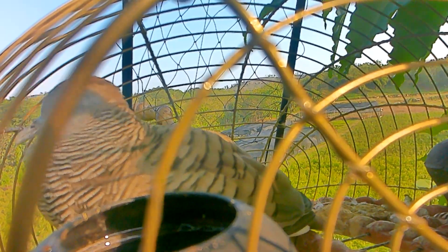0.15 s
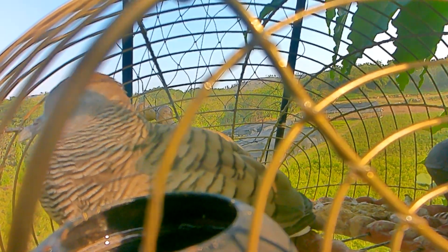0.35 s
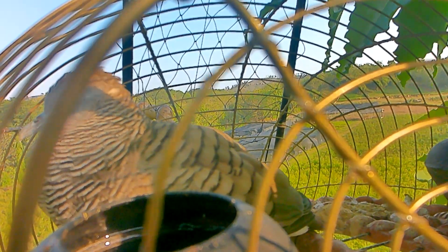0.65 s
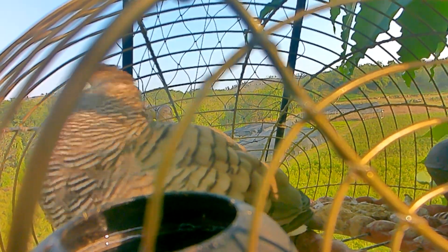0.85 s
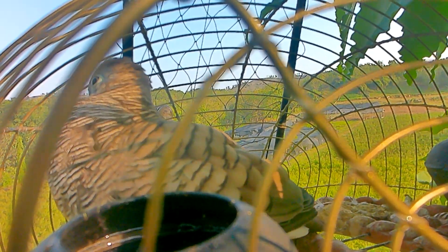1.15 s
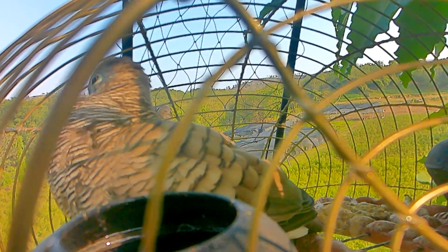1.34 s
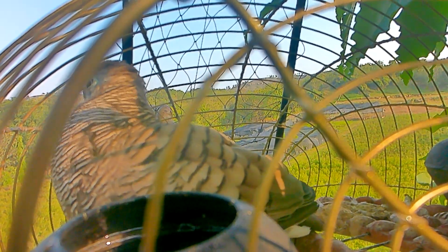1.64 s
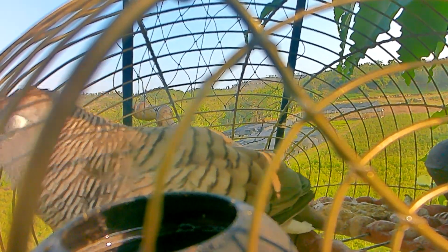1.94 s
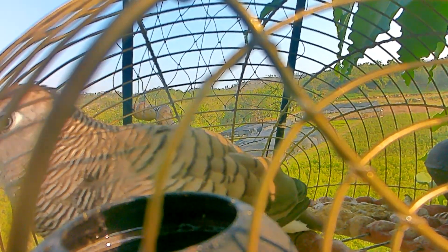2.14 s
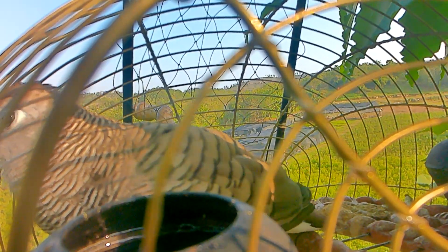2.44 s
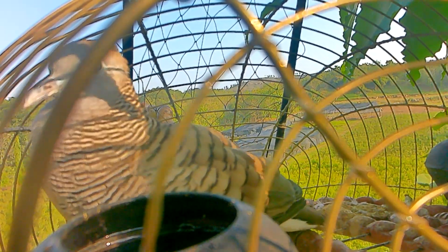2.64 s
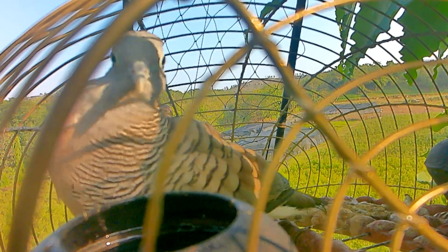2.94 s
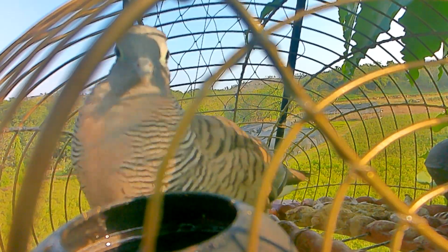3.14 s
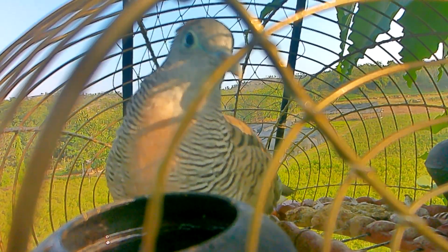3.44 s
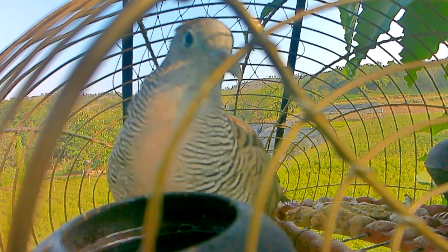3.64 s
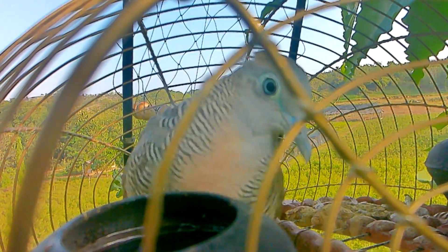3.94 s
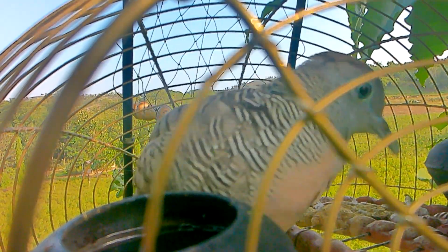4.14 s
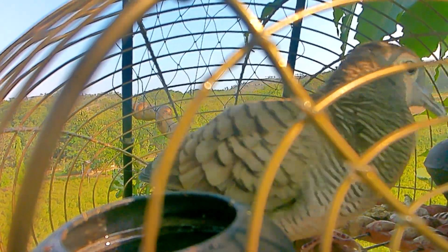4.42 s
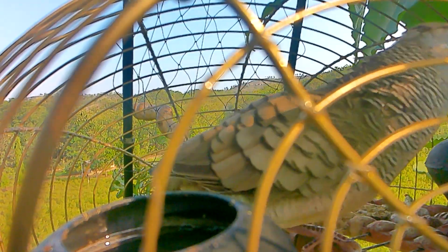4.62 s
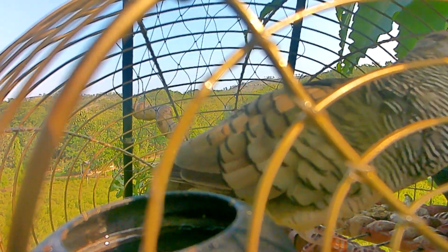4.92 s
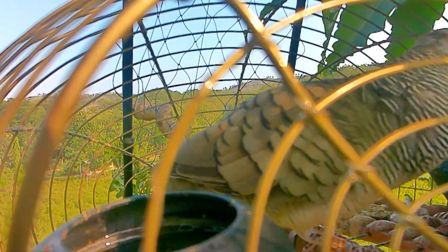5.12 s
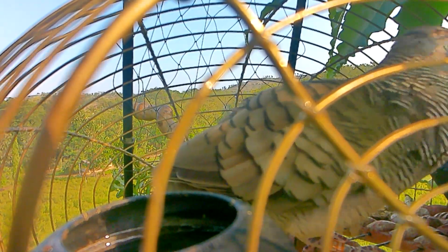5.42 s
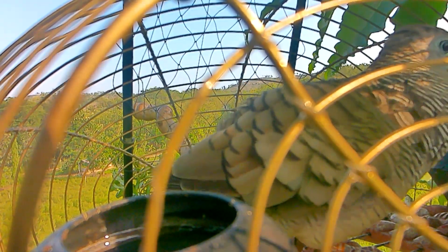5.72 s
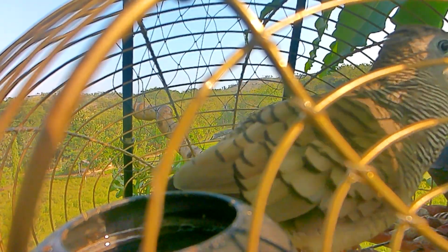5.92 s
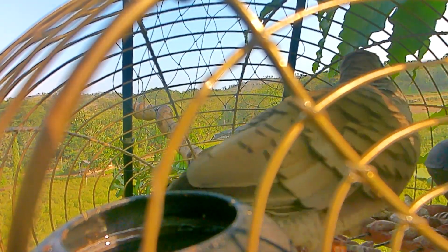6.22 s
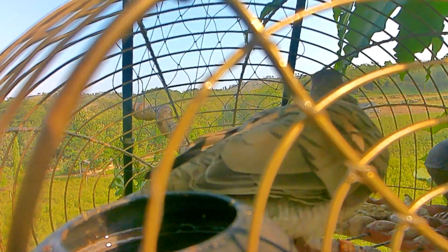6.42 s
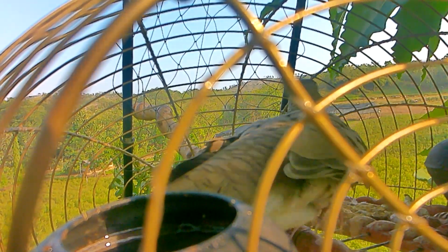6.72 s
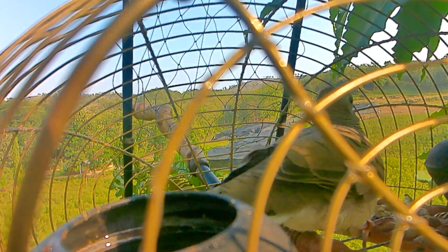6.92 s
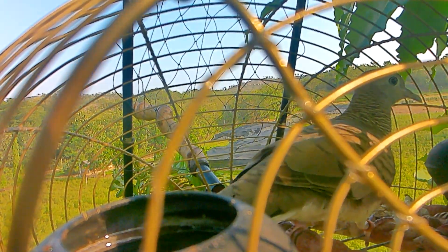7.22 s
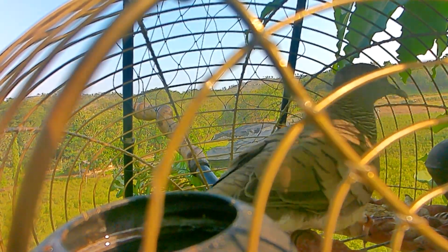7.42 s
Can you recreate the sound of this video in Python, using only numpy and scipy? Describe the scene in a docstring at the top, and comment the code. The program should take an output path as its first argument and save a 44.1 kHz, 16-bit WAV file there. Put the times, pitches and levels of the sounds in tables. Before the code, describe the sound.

Outdoors beside a field, a dove in a wicker cage close to the microphone coos one short phrase, a warbling whistled note followed by a few quick ones. Its feet tap and scuff lightly on the cane, then it coos a second, softer phrase and steps about again. A steady low rumble with puffs of wind on the microphone lies underneath, and faint far doves early on give way to a small bird's falling chirps.

```python
"""Zebra dove in a wicker cage

A dove beside a field clicks its bill and coos two short phrases close by. Each note swoops up from
a low croak through the resonance of the throat sac and breaks into a near-pure whistle. Between
phrases the bird steps about, exciting the modes of the cage. Far off, doves sound faint even notes
and a small bird gives falling chirps; a low rumble and puffs of wind lie under it all."""
import sys
import numpy as np
from scipy import signal
from scipy.fft import rfft, irfft, next_fast_len
from scipy.io import wavfile
from scipy.ndimage import uniform_filter1d

SR = 44100
rng = np.random.default_rng(int(sys.argv[2]) if len(sys.argv) > 2 else 0)


def master(y):
    """Save y as 16-bit WAV."""
    cut = np.clip(np.atleast_2d(y).T, -1, 1)
    pcm = np.round(cut * 32767)  # scale
    wavfile.write(sys.argv[1], SR, pcm.astype(np.int16))


N = 333387
TIME = np.arange(N) / SR
FFT_SIZE = next_fast_len(N, True)
FREQ = np.fft.rfftfreq(FFT_SIZE, 1 / SR)


def amp(db):
    """Decibels to amplitude ratio."""
    return 10 ** (np.asarray(db) / 20)


def unit(x):
    """Normalisation to rms 1."""
    return x / np.sqrt(np.mean(x ** 2) + 1e-20)


def level_at(spectrum, hz):
    """Interpolation of a spectrum on a log-frequency axis."""
    knots_hz, db = np.transpose(spectrum)
    return np.interp(np.log(hz + 1), np.log(knots_hz + 1), db)


def add(mix, start, sound):
    """Superposition of a sound from a start time in seconds."""
    part = mix[max(round(start * SR), 0):][:len(sound)]
    part += sound[:len(part)]


def colour(x, spectrum):
    """Filtering by multiplication of spectra."""
    return irfft(rfft(x, FFT_SIZE) * amp(level_at(spectrum, FREQ)), FFT_SIZE)[:N]


def noise(spectrum):
    """Coloured Gaussian noise of rms 1."""
    return unit(colour(rng.standard_normal(FFT_SIZE), spectrum))


def drift(per_s):
    """Random modulation of rms 1."""
    count = int(2 * per_s * N / SR) + 2
    return unit(np.interp(TIME, np.linspace(0, N / SR, count), rng.standard_normal(count)))


def resonate(x, hz, width):
    """A damped resonator with gain 1 at its centre."""
    r = np.exp(-np.pi * width / SR)
    return 2 * signal.lfilter([1 - r], [1, -r * np.exp(2j * np.pi * hz / SR)], x + 1e-18).real


def ring(x, hz, width):
    """Two resonators in cascade give steep skirts; the output has rms 1."""
    return unit(resonate(resonate(x, hz, width), hz, width))


def scatter(x, t60, delay):
    """Diffuse reflection: a dense tail of echoes decays exponentially."""
    t = np.arange(SR // 2) / SR
    tail = rng.standard_normal(len(t)) * np.exp(-np.log(1000) * t / t60) * (t > delay)
    return signal.fftconvolve(x, tail / np.linalg.norm(tail))[:N]


# gusts: (time [s], half length [s], buffeting level [dB], relative rumble level [dB])
GUSTS = [(.04, .03, -35, -48), (.22, .08, -30.5, -36), (.47, .05, -37, -38), (1.03, .14, -36, -39),
         (2.2, .045, -46, -33), (2.66, .05, -52, -39), (3.66, .09, -36, -39), (3.875, .035, -19.5, -23),
         (4.32, .09, -36, -46), (4.63, .05, -30, -45), (4.91, .025, -24, -35), (5.65, .04, -37, -37),
         (6.36, .13, -47, -36), (7.39, .08, -38, -39)]


def breeze(peaks_db, calm_db, wander_db):
    """Incoherent addition: a wandering calm and bell-shaped gusts sum in power to one envelope."""
    swells = [amp(db) * np.exp(-((TIME - centre) / half) ** 2 / 2)
              for (centre, half, *_), db in zip(GUSTS, peaks_db)]
    calm = amp(calm_db + wander_db * drift(3))
    return np.linalg.norm([calm] + swells, axis=0)


# distant murmur of the countryside and its hiss: (frequency [Hz], relative density [dB])
MURMUR = [(20, -15), (70, -7), (110, -8), (160, -9), (240, -17), (400, -16), (480, -15), (600, -25),
          (800, -35), (1500, -42.5), (3000, -46.5), (7000, -52), (16000, -51.5)]


def background():
    """Filtered noise: a steady murmur, a deep band that swells with the gusts and a narrow drone."""
    strength = breeze([db for *_, db in GUSTS], calm_db=-44, wander_db=1.5)
    rumble = amp(-.5) * strength * ring(rng.standard_normal(N), hz=67, width=36)
    drone = amp(-56.5) * ring(rng.standard_normal(N), hz=462, width=24)
    return amp(-45) * noise(MURMUR) + rumble + drone


# buffeting of the wind: (frequency [Hz], relative density [dB])
BUFFETING = [(8, -5.5), (25, 2), (45, 0), (90, -11), (160, -20), (300, -33), (500, -40), (1000, -63),
             (4000, -90)]


def wind(eddy_db=-34):
    """Turbulence: pressure fluctuates at low frequencies, and the strongest gusts shed higher eddies."""
    strength = breeze([db for _, _, db, _ in GUSTS], calm_db=-48.5, wander_db=2.5)
    buffeting = strength * noise(BUFFETING)
    eddies = (strength / strength.max()) ** 2 * ring(rng.standard_normal(N), hz=140, width=110)
    return buffeting + amp(eddy_db) * eddies


SCOOP_HZ, SCOOP_S = 115, .012  # the whistle rises to its pitch
BREAK_DB, BREAK_S = -9, .0015  # it catches at the register break
WARBLE_PER_S, WARBLE_LEAD_S, WARBLE_DB_PER_HZ = 26.5, .0095, .045
RELEASE_S, RELEASE_DB, RELEASE_DROP_HZ = .028, -38, 90  # it drops as the effort dies away
FLARE_DB_PER_HZ = .16  # overtones flare at each crest of the warble
FULL_VOICE_DB, SOFT_BRIGHTENING = -22, .55  # in soft notes they fall less than the fundamental
# opening swoop: (stage [0-1 croak, 1-2 upward glide], pitch [Hz], relative level [dB])
SWOOP = [(0, 290, -22), (.5, 340, -12), (1, 480, -6), (1.17, 880, -6), (1.5, 952, -2), (1.75, 985, -1.2),
         (2, 1050, -8)]


def contour(t, start, croak_end, turn, release, swoop_db, whistle_db, top_hz, sag_hz, swell_db,
            warble_hz):
    """Frequency and amplitude modulation: a swoop turns into a sagging whistle whose warble deepens."""
    stages, glide_hz, glide_db = np.transpose(SWOOP)
    stage = np.interp(t, [start, croak_end, turn], np.arange(3))
    since = np.maximum(t - turn, 0)
    held = np.minimum(since / (release - turn), 1)
    dying = np.maximum(t - release, 0) / RELEASE_S
    warble = warble_hz * np.sqrt(held) * np.cos(2 * np.pi * WARBLE_PER_S * (t - release + WARBLE_LEAD_S))
    scoop = SCOOP_HZ * np.exp(-since / SCOOP_S)
    catch = BREAK_DB * np.exp(-since / BREAK_S)
    hz = top_hz - scoop - sag_hz * held ** 2 + warble - RELEASE_DROP_HZ * dying
    db = whistle_db + catch + swell_db * held ** 2 + WARBLE_DB_PER_HZ * warble + RELEASE_DB * dying
    hz = np.where(t < turn, np.interp(stage, stages, glide_hz), hz)
    db = np.where(t < turn, swoop_db + np.interp(stage, stages, glide_db), db)
    bright_db = FLARE_DB_PER_HZ * warble + SOFT_BRIGHTENING * (FULL_VOICE_DB - whistle_db)
    return hz, db, bright_db


# transmission of the closed bill and swollen throat: (frequency [Hz], gain [dB])
THROAT = [(280, -5), (450, 3), (680, -8), (950, 1), (1330, -3.5), (1650, -28), (2000, -26), (2420, -33.5),
          (2700, -50), (3700, -43.5), (5000, -48), (9000, -48.5), (13000, -59)]
# rushing air in the voice: (frequency [Hz], relative density [dB])
BREATH = [(150, -6), (400, 0), (1200, -3), (2000, -9), (2600, -28), (9000, -50)]
# notes at the source; one that starts at its register break has no swoop:
# (start [s], end of croak [s], register break [s], release [s], swoop level [dB],
#  whistle level [dB], pitch [Hz], sag [Hz], swell [dB], warble depth [Hz])
COOS = [ (-.04, -.03, -.02, .001, -30, -29, 1170, 0, 0, 0),
        (2.001, 2.019, 2.042, 2.163, -19.5, -20.6, 1288, 85, -.5, 23),
        (2.172, 2.172, 2.172, 2.201, -30, -22.5, 1215, 40, 1, 0),
        (2.222, 2.227, 2.241, 2.253, -19, -22.5, 1220, 50, -2, 0),
        (2.303, 2.312, 2.325, 2.343, -19.5, -22.5, 1225, 65, -2.5, 0),
        (2.404, 2.414, 2.427, 2.519, -19.5, -20.5, 1268, 140, -7, 0),
        (4.808, 4.816, 4.849, 4.963, -29, -21.7, 1248, 65, -1.5, 26),
        (4.975, 4.975, 4.975, 4.998, -40, -34, 1190, 10, 8, 0),
        (5.019, 5.023, 5.04, 5.045, -30, -32, 1175, 25, -1, 0),
        (5.097, 5.104, 5.12, 5.132, -29.5, -31.5, 1210, 70, -4, 0),
        (5.199, 5.207, 5.221, 5.286, -28.5, -24.5, 1258, 85, -4, 0)]


def dove(sac_db=3, octave_db=-4.2, jitter=.005, shimmer_db=.6, air_db=-31, edge_s=.0025, flutter_db=3.5):
    """Source and filter: a harmonic tone is shaped by the throat and the resonance of its sac."""
    tone, airflow = np.zeros(N), np.zeros(N)
    waver, tremble, flutter = drift(120), drift(99), amp(flutter_db * drift(35))
    for note in COOS:
        start, _, _, release, *_ = note
        on = (TIME >= start) & (TIME < release + RELEASE_S)
        t = TIME[on]
        hz, db, bright_db = uniform_filter1d(np.array(contour(t, *note)), size=70)
        phase = 2 * np.pi * np.cumsum(hz * (1 + jitter * waver[on])) / SR
        fade = np.clip(np.minimum(t - t[0], t[-1] - t) / edge_s, 0, 1)
        effort = amp(db + shimmer_db * tremble[on]) * fade
        overtones = sum(amp(octave_db * np.log2(k)) * np.sin(k * phase) for k in range(2, 11))
        tone[on] += effort * (np.sin(phase) + amp(bright_db) * flutter[on] * overtones)
        airflow[on] += effort
    # the throat passes several harmonics of the low croak but little beyond the whistle's first
    voice = colour(tone, THROAT) + amp(air_db) * airflow * noise(BREATH)
    return voice + amp(sac_db) * resonate(voice, hz=975, width=110)


# far doves and small birds: (time [s], length [s], pitch [Hz], relative level [dB])
FAR_NOTES = [(.02, .25, 1278, -71), (.16, .1, 2800, -74), (.6, .35, 710, -70), (1.0, .3, 1288, -71.5),
             (1.35, .3, 705, -69), (4.69, .035, 5250, -69)]


def far_notes(bend=.02, rasp=.018):
    """Near-pure tones: one half sine arches both the amplitude and, slightly, the pitch."""
    out = np.zeros(N)
    wavers = np.array_split(drift(120), len(FAR_NOTES))
    for (start, length, pitch, db), waver in zip(FAR_NOTES, wavers):
        arch = np.sin(np.linspace(0, np.pi, int(length * SR)))
        hz = pitch * (1 + bend * (arch - 1) + rasp * waver[:len(arch)])
        add(out, start, amp(db) * arch * np.sin(2 * np.pi * np.cumsum(hz) / SR))
    return out


# modes of the wicker cage: (frequency [Hz], bandwidth [Hz], relative level [dB])
CAGE_MODES = [(505, 70, 0), (542, 65, -3.5), (850, 220, -15), (1160, 80, -13), (1255, 100, -17),
              (1470, 110, -29), (2210, 110, -22.5), (2340, 140, -24), (2630, 240, -27), (4150, 700, -43),
              (5300, 400, -41)]
# feet on perch and cage, and one bill click just before the first coo:
# (time [s], relative level [dB], hollow clack [dB], brightness [dB], scuff decay [s])
TAPS = [(.043, -50, 3, 0, .005), (1.968, -46, 11, -1, .001), (3.086, -41, 9, 11, .006),
        (3.094, -30, -4, -3, .009), (3.137, -37, 0, -1, .009), (3.688, -48, -2, -6, .006),
        (4.026, -46.5, -2, -6, .008), (4.099, -45, -1, -4, .01), (4.226, -58, 7, 17, .014),
        (4.265, -40.5, 0, -4, .01), (4.374, -47, 4, 0, .01), (4.425, -35, 0, -7, .008),
        (4.457, -45, 1, 1, .008), (4.772, -47, 5, 1, .002), (6.194, -43, -3, -1, .014),
        (6.421, -37, 1, -8, .009), (6.461, -45, 0, -3, .008), (6.763, -55, 4, 11, .014),
        (6.807, -47, 4, 4, .024), (6.951, -32, -15, -7, .008), (6.983, -34, -13, -4, .008),
        (7.05, -51, 6, 5, .012), (7.084, -51, 4, 10, .006), (7.498, -48, 2, 3, .006),
        (7.528, -43, 4, 18, .008)]


def taps(scuff=.7, gain_db=-10.5):
    """Impact excitation: a step or bill click is an impulse and a brief scuff that ring damped modes."""
    out, t = np.zeros(N), np.arange(SR // 10) / SR
    for start, db, clack_db, bright_db, decay in TAPS:
        push = scuff * rng.standard_normal(len(t)) * np.exp(-t / decay)
        push[0] += 1
        # a soft touch excites the lowest modes, a firm one the middle, a hard one the top
        touch = [(600, 0), (800, clack_db), (1500, clack_db), (2100, bright_db)]
        knock = sum(amp(mode_db + level_at(touch, hz)) * ring(push, hz, width)
                    for hz, width, mode_db in CAGE_MODES)
        add(out, start, amp(db + gain_db) * knock)
    return out


# sharp puffs of wind: (time [s], level before filtering [dB], decay [s])
PUFFS = [(.2555, -13.5, 0.0016), (3.859, -17, .005), (4.92, -19.5, 0.0037)]


def puffs(cutoff_hz=380):
    """Pressure transients: a sudden compression and a weaker rarefaction, low-passed to a thump."""
    out, t = np.zeros(N), np.arange(SR // 10) / SR
    lowpass = signal.butter(4, cutoff_hz, fs=SR)
    for start, db, decay in PUFFS:
        pulse = (1 - t / decay) * np.exp(-t / decay)
        add(out, start, amp(db) * signal.lfilter(*lowpass, pulse))
    return out


# spells in which the bird shuffles round: (start [s], end [s])
SHUFFLES = [(3.1, 4.8), (6.75, 7.12)]


def patter(level_db=-64.5, ticks_per_s=1000):
    """Shot noise: the turning bird's many tiny impacts drive the modes of the cage."""
    moving = sum((TIME > start) & (TIME < end) for start, end in SHUFFLES)
    ticks = moving * rng.standard_normal(N) * (rng.random(N) < ticks_per_s / SR)
    return amp(level_db) * unit(sum(amp(db) * ring(ticks, hz, width) for hz, width, db in CAGE_MODES))


# the far bird's falling chirps: (time [s], relative level [dB])
CHIRPS = [(4.929, -61.5), (5.583, -61), (6.392, -60.5), (7.1, -59.5)]


def far_chirps(top_hz=6400, floor_hz=2480, fall_s=.043, length_s=.138, rasp=.018):
    """Frequency sweep: the pitch falls exponentially, and random modulation makes it rasp."""
    out, t = np.zeros(N), np.arange(0, length_s, 1 / SR)
    glide = floor_hz + (top_hz - floor_hz) * np.exp(-t / fall_s)
    envelope = np.sin(np.pi * t / length_s) ** .56
    for (start, db), waver in zip(CHIRPS, np.array_split(drift(400), len(CHIRPS))):
        hz = glide * (1 + rasp * waver[:len(t)])
        add(out, start, amp(db) * envelope * np.sin(2 * np.pi * np.cumsum(hz) / SR))
    return out


def across_field(calls, direct_db=-2, flicker_db=2):
    """Outdoor propagation: the direct sound flickers, and ground and foliage scatter an echo."""
    direct = calls * amp(direct_db + flicker_db * drift(60))
    return direct + scatter(calls, t60=.36, delay=.003)


def scene(echo_db=-24, rattle_db=-5.5):
    """Superposition in open air: the cage is close, and its canes rattle briefly after each tap."""
    voice = dove()
    knocks = taps() + patter()
    echo = amp(echo_db) * scatter(voice, t60=.15, delay=.0099)
    rattle = amp(rattle_db) * scatter(knocks, t60=.16, delay=.004)
    far_birds = across_field(far_chirps() + far_notes())
    return (voice + echo + knocks + rattle + far_birds + wind() + puffs() + background())[None]


def record(dry, cutoff_hz=15800, dc_offset=.0266):
    """Band limiting: a steep low-pass removes the highest treble; a small constant offset is added."""
    lowpass = signal.firwin(511, cutoff_hz, window=("kaiser", 9), fs=SR)
    return signal.oaconvolve(dry, lowpass[None], "same") + dc_offset


dry = scene()
out = record(dry)
master(out)
```